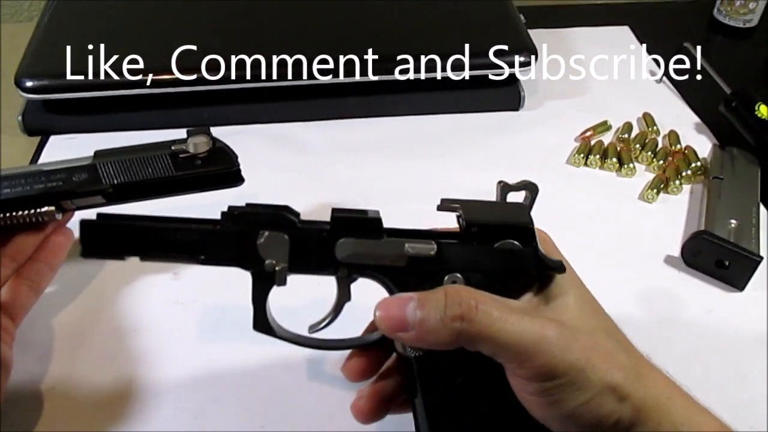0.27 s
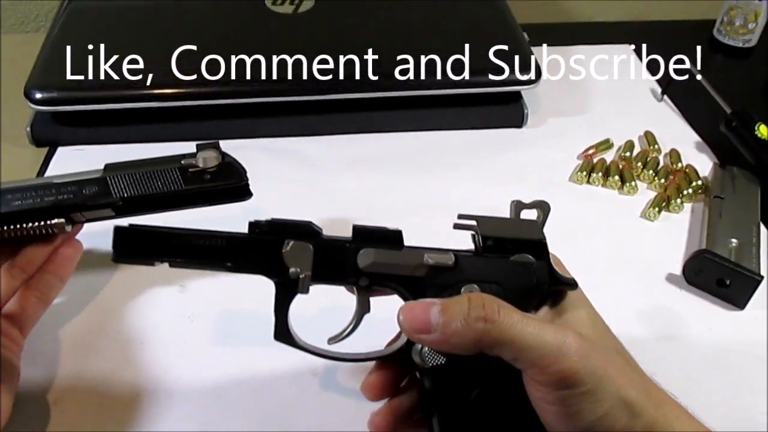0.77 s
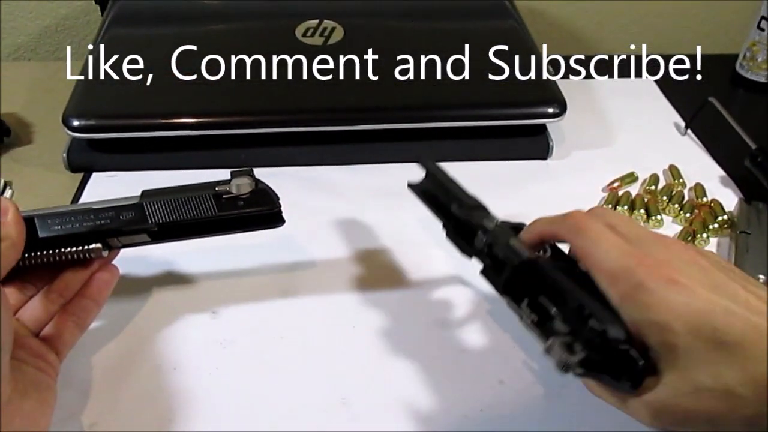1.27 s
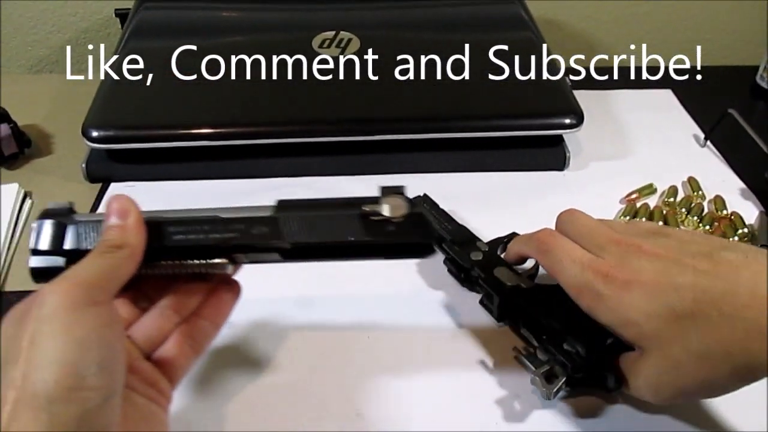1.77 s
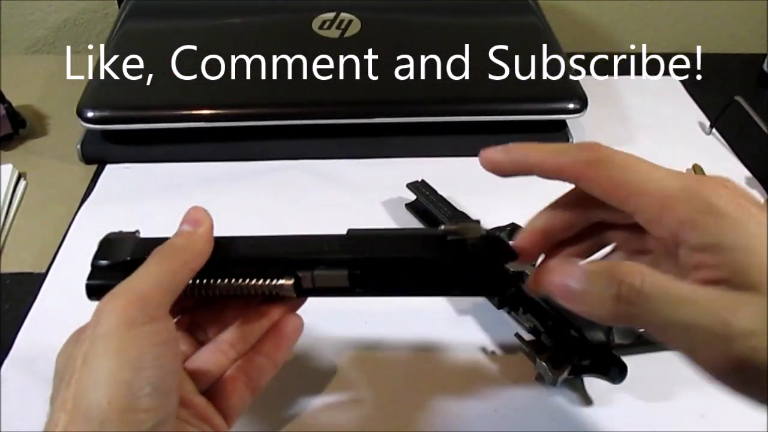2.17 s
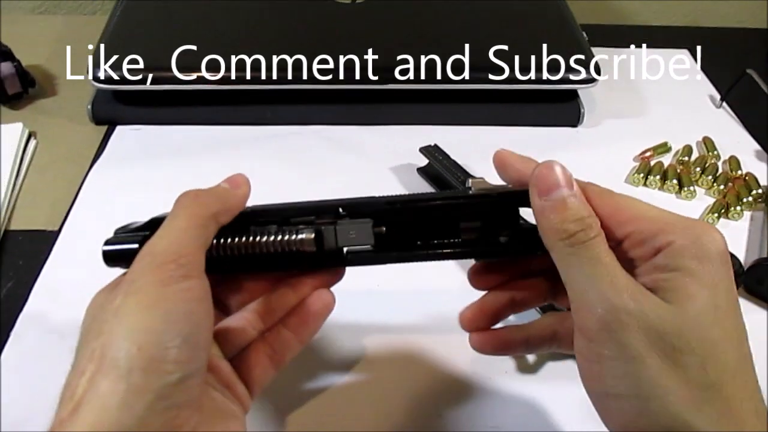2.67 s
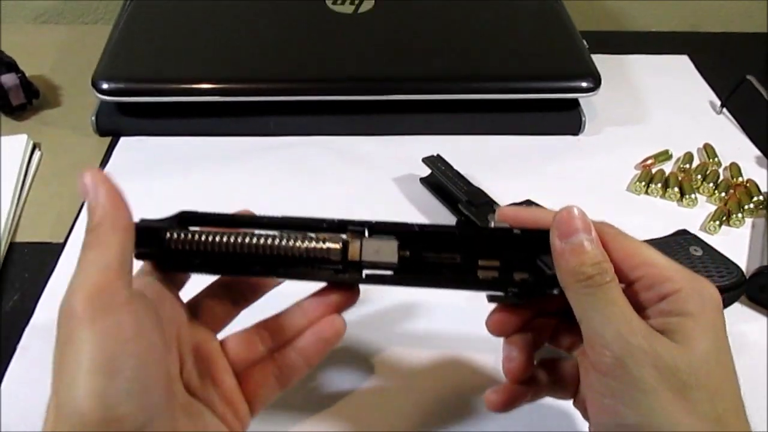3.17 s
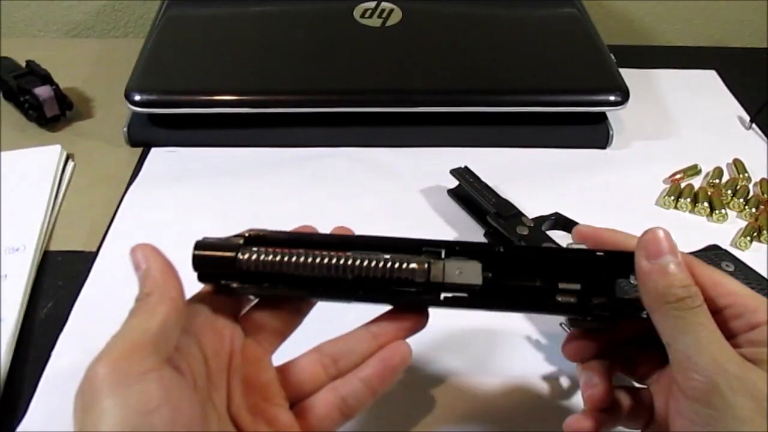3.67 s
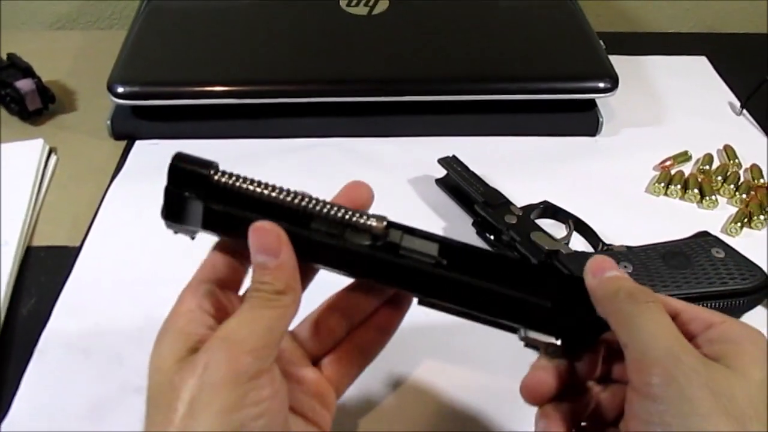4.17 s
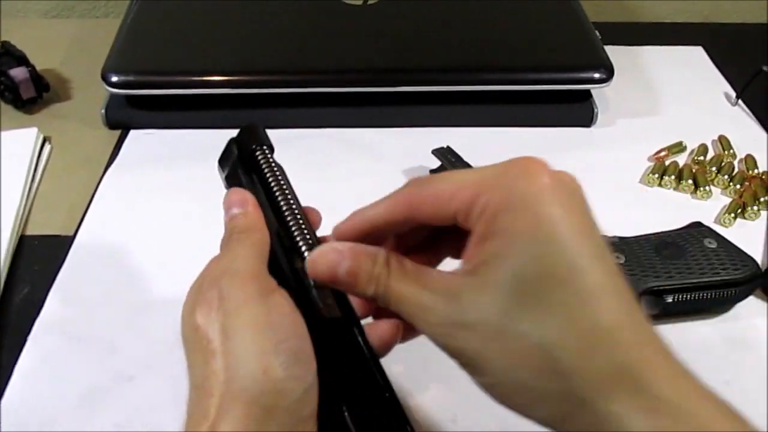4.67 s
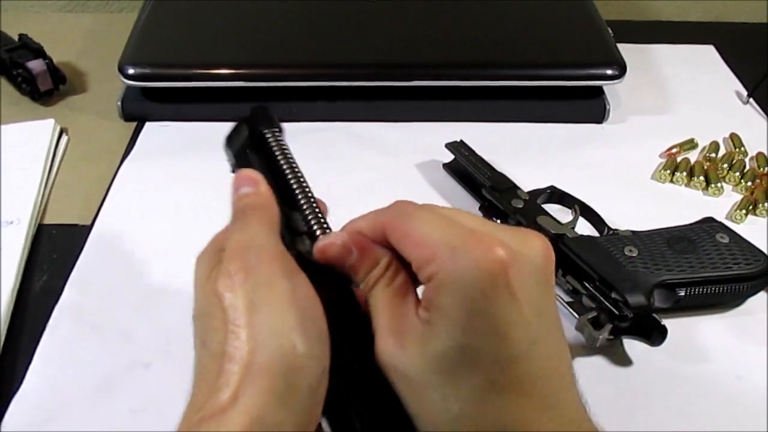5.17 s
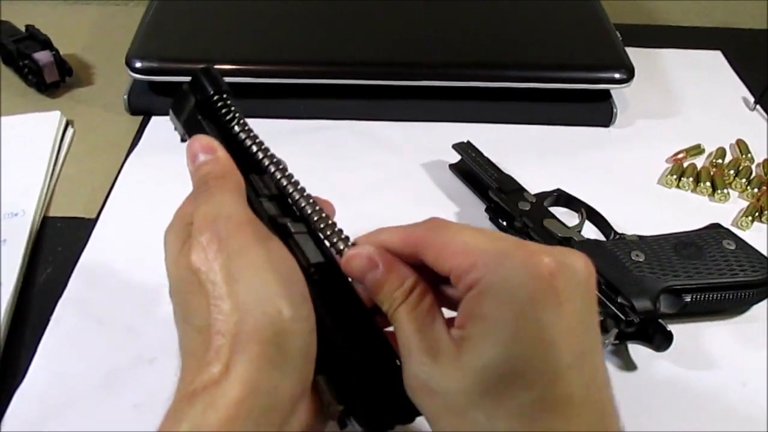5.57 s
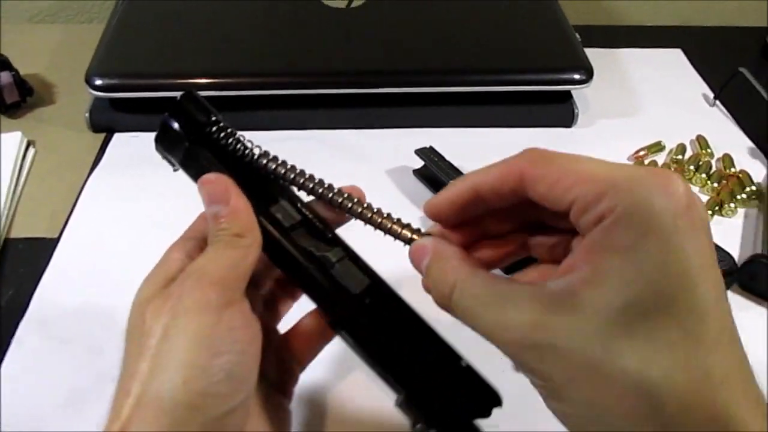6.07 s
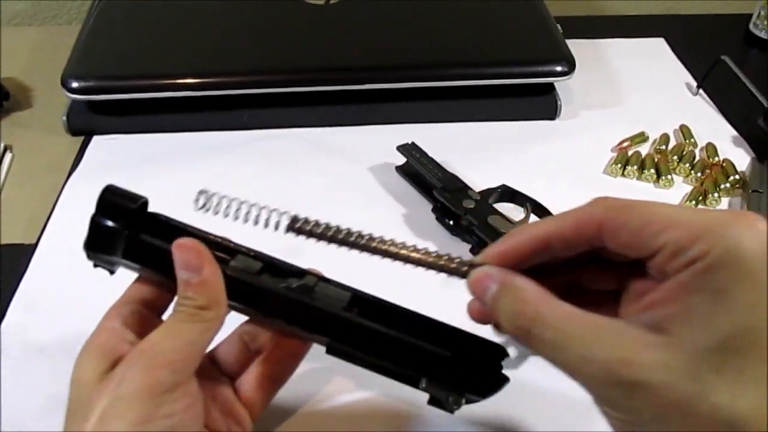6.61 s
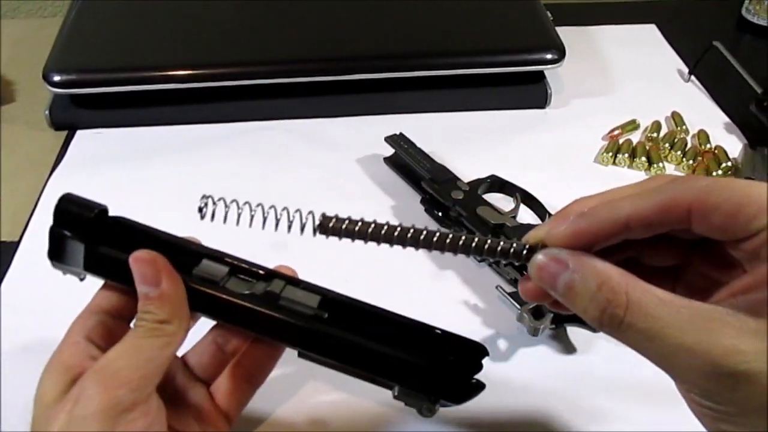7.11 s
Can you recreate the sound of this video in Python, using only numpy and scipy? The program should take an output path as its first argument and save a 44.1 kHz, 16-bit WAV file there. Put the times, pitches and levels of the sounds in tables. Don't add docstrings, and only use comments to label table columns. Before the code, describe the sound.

A quiet room with low ventilation rumble, close camera microphone. Brief rubbing of skin and sleeve, then a steel pistol frame lands on a hollow wooden table in two loud thuds with quick bounces and a lighter settling knock. Tiny dry ticks follow. Later a guide rod snaps out with bright, short metallic clacks, and a spring gives faint, high scratchy ticks.

```python
import sys
import numpy as np
from scipy import signal
from scipy.fft import rfft, irfft
from scipy.io import wavfile
from scipy.ndimage import uniform_filter1d

SR = 44100
rng = np.random.default_rng(int(sys.argv[2]) if len(sys.argv) > 2 else 0)


def generate_wav(signal):
    frames = np.transpose(np.atleast_2d(signal))
    scaled = np.clip(frames, -1, 1) * 32767
    pcm = np.round(scaled).astype(np.int16)
    wavfile.write(sys.argv[1], SR, pcm)


def ratio(d):
    e = np.asarray(d, float) / 20
    return 10 ** e


N = 323951


def rms_one(x):
    return x / np.sqrt(np.mean(x ** 2) + 1e-20)


def butter(x, order, hz, kind="low"):
    return signal.sosfilt(signal.butter(order, hz, kind, fs=SR, output="sos"), x)


def level(spans):
    t = np.arange(N) / SR
    return sum(ratio(np.interp(t, *np.transpose(rows)[:2], left=-200, right=-200)) for rows in spans)


def at_hz(points, hz):
    points_hz, values = np.array(points)[:, :2].T
    return np.interp(np.log(hz), np.log(points_hz), values)


def coloured(points, size=N):
    hz = np.maximum(np.fft.rfftfreq(size, 1 / SR), 1)
    edge = np.minimum(hz / points[0][0], 1) ** 2 * (hz < 15830)
    spectrum = rfft(rng.standard_normal(size)) * ratio(at_hz(points, hz)) * edge
    return rms_one(irfft(spectrum, size))


def ring(x, hz, t60):
    r, w = ratio(-60 / (t60 * SR)), 2 * np.pi * hz / SR
    return signal.lfilter([0, np.sin(w)], [1, -2 * r * np.cos(w), r * r], x)


def blows():
    # (t/s, peak level/dB, contact f/Hz, crack level/dB)
    landings = [
        (1.5934, -6, 1520, -17.5),
        (1.822, -2, 1000, -11.5),
        (1.9652, -19, 1360, -28),
    ]
    # (t/s, peak level/dB, spot 0-2)
    rebounds = [
        (1.6102, -10, 0),
        (1.8315, -8.5, 1),
        (1.9678, -19, 2),
        (1.9694, -17, 2),
        (1.976, -20.5, 2),
    ]
    crack_db, dulling = -19.5, 0.73
    rock_start_s, rock_gap_s, shrink = 2.286, 0.15, 0.85
    out = [(*row, spot) for spot, row in enumerate(landings)]
    for s, db, spot in rebounds:
        out.append((s, db, dulling * landings[round(spot)][2], db + crack_db, spot))
    for k in range(4):
        s = rock_start_s + rock_gap_s * (1 - shrink ** k) / (1 - shrink)
        db = -35.5 - 3 * k
        out.append((s, db, 770, db + crack_db, 2))
    return out


def table():
    # (f/Hz, t60/s, level/dB struck at spot 0, spot 1, spot 2)
    table_modes = [(126.6, 0.5, -33, -17.5, -14), (193.7, 0.51, -19, -16.5, -4.5),
                   (254, 0.44, -46, -34, -14), (305.3, 0.2, -36, -8.5, -1), (358.3, 0.13, -13.5, -9.5, -3),
                   (423, 0.06, -18, -5.5, 5), (475, 0.088, -38, -43, -14), (524, 0.094, -18, -13.5, -0.5),
                   (583, 0.047, -11, -11.5, -1.5), (646, 0.061, -25, -18, -2.5),
                   (720, 0.043, -11.5, -35, -32), (789, 0.1, -9.5, -17, -31), (833, 0.076, -23, -29, -29),
                   (881, 0.14, -22.5, -16, -44), (1054, 0.096, -24, -24, -41), (483, 0.0091, -2, -8, -7),
                   (800, 0.0024, -16, -3, -18.5)]
    # (f/Hz, level/dB per Hz at spot 0, spot 1, spot 2)
    crack_colour = [(700, -9, -5, 12), (1000, -3, -3, 0), (1320, -32, 0, -7), (1630, 11, -3.5, 0),
                    (2210, 9, 5, 0), (2670, -10, -14, 2), (2830, 0.5, 1.5, 7), (3940, -5.5, -14, -3.5),
                    (5940, -21, -26.5, -11), (10000, -35, -31.5, -32), (15500, -52, -58, -43)]
    # (t/s, peak level/dB, f/Hz, t60/s)
    thumps = [
        (1.439, -29, 43.2, 0.63),
        (1.442, -24, 106, 0.08),
        (1.451, -48.5, 940, 0.55),
    ]
    body, crack, t = np.zeros(N), np.zeros(N), np.arange(SR) / SR
    for s, peak_db, contact_hz, crack_db, spot in blows():
        spot, at = round(spot), round(s * SR)
        push = np.full(SR, 1e-18)
        push[22] = -ratio(peak_db)
        rings = sum(ratio(mode[2 + spot]) * ring(push, *mode[:2]) for mode in table_modes)
        body[at:at + SR] += butter(rings, 2, contact_hz)
        early, late = ratio(-60 * t / 0.019), ratio(-24 - 60 * t / 0.44)
        fade = (early + late) * np.minimum(t / 0.00034, 1)
        noise = coloured(np.array(crack_colour)[:, [0, 1 + spot]], size=SR)
        crack[at:at + SR] += ratio(crack_db) * fade * noise
    body = butter(body, 2, 150, "high")
    for s, db, hz, t60 in thumps:
        click = np.full(N, 1e-18)
        click[int(s * SR)] += ratio(db)
        body = body + ring(click, hz, t60)
    return body, crack


def strokes(rows):
    spans = []
    for s, length, peak_db, share, *rest in rows:
        rise = length * np.clip(share, .05, .95)
        fall = length - rise
        times = [s, s + 0.19 * rise, s + rise, s + length - 0.19 * fall, s + length]
        shape = [-24, -8.5, 0, -8.5, -24]
        spans.append([(at, peak_db + db, *rest) for at, db in zip(times, shape)])
    return spans


def grains(per_s, spread_db):
    sizes = ratio(spread_db * np.minimum(rng.exponential(1, N), 5)) * rng.choice([-1, 1], N)
    return rms_one(sizes * (rng.random(N) < per_s / SR))


def hit_steel(hits, modes, click, grip_t60):
    t, struck = np.arange(4096) / SR, np.zeros(N)
    for s, peak_db, favoured_hz, fall_db, chatter_s in hits:
        fade, hit = ratio(-20 * t / max(chatter_s, .0005)), 0
        for hz, mode_db, t60 in modes:
            contact = rng.standard_normal(4096) * fade / np.sqrt(np.sum(fade ** 2))
            contact[0] = click * np.sign(contact[0])
            gain = ratio(mode_db - fall_db * abs(np.log2(hz / favoured_hz)))
            hit = hit + gain * ring(contact, hz, min(t60, grip_t60))
        struck[round(s * SR):][:4096] += ratio(peak_db) * hit / np.max(np.abs(hit))
    return struck


def rasp_steel(rasp, modes, per_s, dry_db, grip_t60):
    s, _, favoured_hz = np.concatenate(rasp).T
    favoured_hz = np.interp(np.arange(N) / SR, s, favoured_hz)
    slips, rubbed = grains(per_s, 3.7), 0
    for hz, mode_db, t60 in modes:
        focus = ratio(-12 * abs(np.log2(hz / favoured_hz)))
        drive = ratio(mode_db) * focus * np.roll(slips, rng.integers(N))
        rubbed = rubbed + ring(drive, hz, min(t60, grip_t60))
    scratch = np.diff(grains(3000, 3.0), prepend=0)
    return level(rasp) * (rms_one(rubbed) + ratio(dry_db) * scratch)


def guide_rod():
    # (t/s, peak level/dB, favoured f/Hz, fall/dB per octave away from it)
    snaps = [
        (4.9538, -33.5, 2500, 20),
        (4.9565, -26.5, 4470, 11),
        (4.9817, -8.5, 4700., 19.),
        (4.986, -22, 4600., 20),
        (5.197, -30, 2500., 6),
        (5.204, -16.5, 2280, 7),
        (5.2075, -12, 4750, 7.5),
        (5.23, -31, 5000., 0),
        (5.2487, -28, 3800., 13),
    ]
    # (f/Hz, level/dB, t60/s)
    modes = [(1580, 5, 0.048), (2060, 9.5, 0.012), (2440, 5, 0.021), (3000, -14, 0.0033),
             (3710, 1.5, 0.011), (4310, -0.5, 0.018), (4560, -1.5, .01), (5025, 3.5, 0.034),
             (5450, -2.5, 0.022), (6300, -1, 0.016), (6400, -17, 0.013), (7300, -17, 0.0045),
             (8160, 0, 0.0042), (10000, -5, 0.012)]
    # (start t/s, length/s, peak level/dB, share before the peak, favoured f/Hz)
    rasp = [
        (5.192, 0.087, -42.5, 0.38, 6400),
        (5.35, 0.19, -60.5, 0.28, 3600.),
    ]
    hits = [(*snap, 0.0034 * ratio(-0.78 * (snap[1] + 34))) for snap in snaps]
    steel = hit_steel(hits, modes, click=0.89, grip_t60=0.010)
    steel = steel + rasp_steel(strokes(rasp), modes, per_s=960, dry_db=-15, grip_t60=0.010)
    return butter(steel, 2, [1300, 10500], "band")


def coil_spring():
    # (t/s, peak level/dB, favoured f/Hz, fall/dB per octave away from it)
    coil_ticks = [(5.394, -44, 9000., 8), (5.413, -44, 9250., 5), (5.423, -46, 10000., 3),
                  (5.456, -48, 10500., 6), (5.826, -46, 4570, 13), (6.3805, -31.5, 9000., 11.5),
                  (6.393, -47, 3650., 3), (6.41, -35.5, 10200., 19), (6.4296, -38, 8700., 11),
                  (6.431, -42, 3000., -2), (6.443, -44, 9000., 8), (6.4679, -32, 10000., 5),
                  (6.472, -35, 8700, 27), (6.481, -38, 8000., 26), (6.509, -45.5, 7900, 26)]
    # (f/Hz, level/dB, t60/s)
    modes = [(2070, 8, 0.0061), (2400, 2, 0.024), (3000, -18, 0.005), (3650, -2.5, 0.013),
             (4400, -3, 0.0044), (6040, -11, 0.0038), (7200, -16, .006), (8000, -20, 0.022),
             (8670, -13.5, 0.0082), (9250, -14, 0.0083), (10200, -10.5, 0.013), (11600, -15, 0.0042),
             (13100, -14, .004), (15000, -5, 0.003)]
    # (start t/s, length/s, peak level/dB, share before the peak, favoured f/Hz)
    rasp = [
        (5.375, 0.12, -57, 0.38, 9900.),
        (5.487, 0.057, -70, 0.55, 9000.),
        (5.81, 0.11, -68, 0.33, 8000.),
        (6.25, .124, -64.5, 0.75, 7300),
        (6.376, .075, -57, .15, 7500.),
        (6.453, 0.076, -59, .4, 7000.),
    ]
    hits = [(*tick, 0.0071) for tick in coil_ticks]
    steel = hit_steel(hits, modes, click=0.35, grip_t60=0.016)
    steel = steel + rasp_steel(strokes(rasp), modes, per_s=600, dry_db=-21, grip_t60=0.016)
    return butter(steel, 2, [1300, 15000], "band")


def rubbing_hands():
    # (start t/s, length/s, peak level/dB, share of the length before the peak)
    rubs = [
        (.875, 0.057, -62, 0.67),
        (.926, 0.16, -56.5, 0.76),
        (1.078, 0.22, -59, 0.26),
        (1.27, .095, -64.5, 0.95),
        (1.385, 0.062, -53.5, 0.96),
        (1.453, 0.083, -60.5, 0.24),
    ]
    # (f/Hz, level/dB per Hz)
    rub_colour = [(900, -1), (2000, 13), (3300, 13), (4500, 12.5), (6000, 9), (7500, 9), (9000, 5.5),
                  (12000, -0.5), (15500, -3)]
    return level(strokes(rubs)) * coloured(rub_colour)


def loose_parts():
    # (t/s, peak level/dB)
    tick_times = [(0.221, -48), (1.3862, -54), (1.423, -38), (1.4994, -47), (1.5814, -37), (1.8674, -45),
                  (1.8874, -49), (1.9764, -44), (2.0324, -42.5), (2.1927, -46), (2.7587, -54),
                  (3.0994, -51), (3.38, -48), (3.46, -53), (3.81, -45), (4.3394, -45), (5.9259, -50),
                  (5.9807, -46)]
    out, fade = np.zeros(N), np.exp(-np.arange(300) / SR / .0005)
    for s, peak_db in tick_times:
        burst = rng.standard_normal(300) * fade + 4 * (fade == 1)
        tick = butter(burst, 2, [2200, 8800], "band")
        out[round(s * SR):][:300] += ratio(peak_db) * tick / np.max(np.abs(tick))
    return out


def room(x, wet_db):
    # (f/Hz, t60/s)
    room_t60 = [(100, 0.48), (500, 0.4), (2000, 0.33), (5000, 0.57), (12000, 0.24)]
    t, tail = np.arange(SR) / SR, 0
    for low in 60 * 2. ** np.arange(8):
        band = butter(rng.standard_normal(SR), 2, [low, 2 * low], "band")
        tail = tail + band * ratio(-60 * t / at_hz(room_t60, 2.6 * low))
    tail = tail * (1 - np.exp(-t / 0.0041))
    return x + ratio(wet_db) * signal.fftconvolve(x, tail / np.sqrt(np.sum(tail ** 2)))[:N]


def air():
    # (f/Hz, level/dB per Hz)
    air_colour = [(12, -37.5), (20, -13.5), (65, -2), (101, -6.5), (172, -6), (248, -12.5), (277, -13.5),
                  (410, -12), (446, -19.5), (485, -18.5), (624, -22.5), (1290, -28), (1570, -36),
                  (3160, -41), (16000, -61.5)]
    # (f/Hz, width/Hz, level/dB)
    hums = [(74.6, 4.2, -57), (119.3, 3.5, -53.5), (240.7, 4.9, -51), (1217, 32, -75)]
    whine = rms_one(ring(rng.standard_normal(N), 11795, 6.0))
    out = ratio(-40.5) * coloured(air_colour) + ratio(-89.5) * whine
    for hz, width_hz, db in hums:
        out = out + ratio(db) * rms_one(ring(rng.standard_normal(N), hz, 3.1 / width_hz))
    return out


def scene():
    body, crack = table()
    handled = guide_rod() + coil_spring() + rubbing_hands() + loose_parts()
    return (room(body, wet_db=-9.5) + crack + room(handled, wet_db=-18.5) + air())[None]


def gain_control(x, knee_db, share, release_db_s):
    loudness_db = 20 * np.log10(uniform_filter1d(np.abs(x), size=441) + 1e-9)
    over = np.maximum(loudness_db - knee_db, 0)
    climb = release_db_s * np.arange(N) / SR
    held = np.maximum.accumulate(share * over + climb) - climb
    return x * ratio(-signal.lfilter([.002], [1, -.998], held))


def band_limit(x):
    return signal.sosfilt(signal.butter(12, 15830, fs=SR, output="sos"), x)


def record(dry):
    x = butter(dry[0], 1, 14000)
    x = np.clip(gain_control(x, knee_db=-25, share=0.17, release_db_s=2.5), -1, 1)
    return band_limit(x)


dry = scene()
out = record(dry)
generate_wav(out)
```